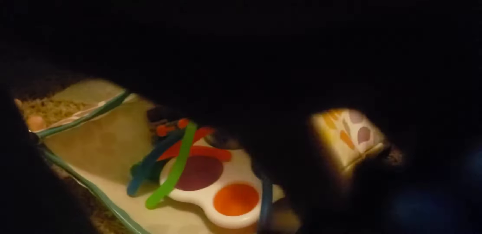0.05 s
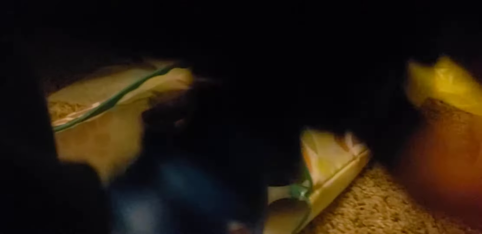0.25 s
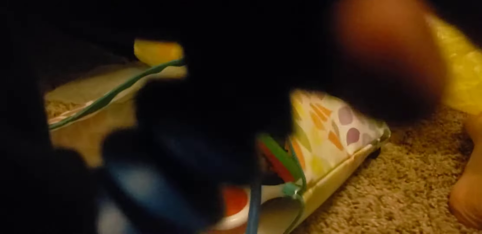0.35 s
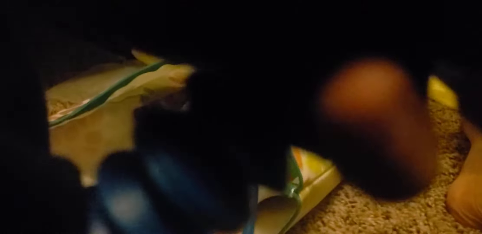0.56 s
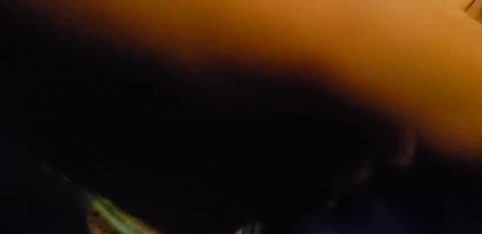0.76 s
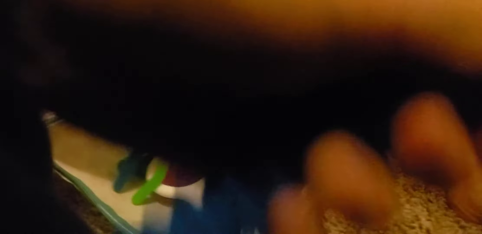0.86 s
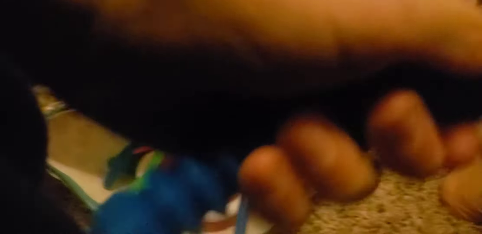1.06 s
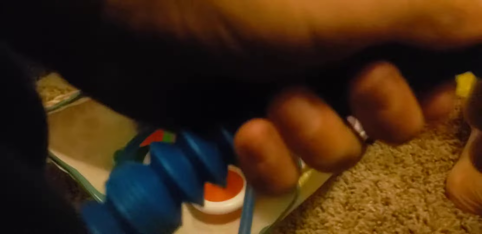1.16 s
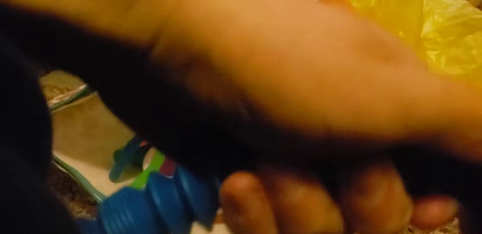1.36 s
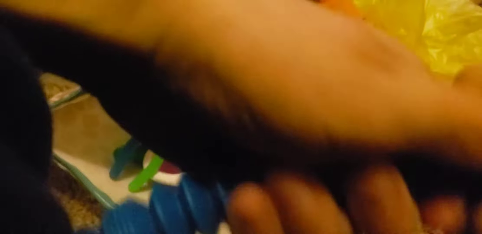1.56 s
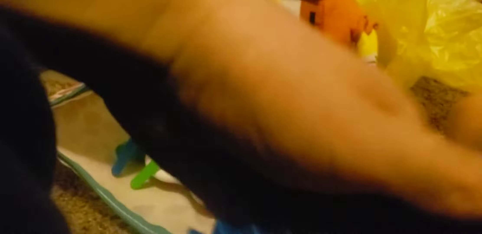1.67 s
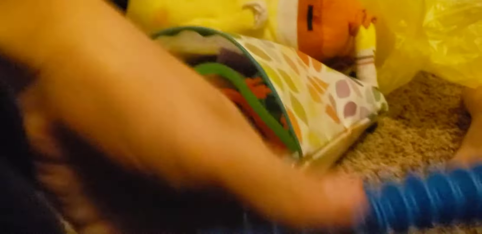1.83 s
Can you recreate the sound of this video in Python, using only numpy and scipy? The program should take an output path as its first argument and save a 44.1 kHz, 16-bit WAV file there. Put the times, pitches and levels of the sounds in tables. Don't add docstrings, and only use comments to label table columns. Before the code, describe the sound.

Sharp plastic snaps with a short hollow ring crowd together early, then small finger ticks, a single pop, and a final tight cluster, with light handling thuds, heard close in a small, dry carpeted room.

```python
import sys
import numpy as np
from scipy import signal
from scipy.io import wavfile
from scipy.ndimage import map_coordinates

SR = 44100
rng = np.random.default_rng(int(sys.argv[2]) if len(sys.argv) > 2 else 0)


def decibels_to_gain(level_db):
    exponent = np.asarray(level_db, float) / 20
    return 10 ** exponent


def generate_wav(signal):
    frames = np.transpose(np.atleast_2d(signal))
    scaled = np.clip(frames, -1, 1) * 32767
    pcm = np.round(scaled).astype(np.int16)
    wavfile.write(sys.argv[1], SR, pcm)


N = 83790
LEAD = SR // 10


def rms_one(x):
    return x / np.sqrt(np.mean(x ** 2) + 1e-20)


def butter(x, hz, kind, order=2):
    return signal.sosfilt(signal.butter(order, hz, kind, fs=SR, output="sos"), x)


def drift(rate_hz):
    knots = rng.standard_normal(400)
    return map_coordinates(knots, [2 + np.arange(N) / SR * rate_hz], order=3)


def bell(x, hz, width_hz, db):
    a, w = decibels_to_gain(db / 2), 2 * np.pi * hz / SR
    q = np.sin(w) * width_hz / hz / 2
    middle = -2 * np.cos(w)
    return signal.lfilter([1 + q * a, middle, 1 - q * a], [1 + q / a, middle, 1 - q / a], x)


def dying(t, t60_s):
    return decibels_to_gain(-60 * t / t60_s)


def add(out, start_s, sound):
    i = int(start_s * SR) + LEAD
    out[i:i + len(sound)] += sound[:len(out) - i]


# time [s], mode spacing [Hz], upper-mode lift per mode [dB], upper-mode ring
COLUMN = [
    (0, 485, 1, 1.0),
    (.26, 496.6, 1.5, 1.0),
    (.35, 498, 0.5, 1.0),
    (.415, 531, 1, 0.78),
    (1.09, 537, 1, .7),
    (1.34, 551.4, -2.5, 0.46),
    (1.45, 590, 0, 0.85),
]
# multiple of spacing [ratio], level [dB], t60 [s]
COLUMN_MODES = [(.93, -16.5, 0.16), (.97, -12, 0.14), (2.0, -1.5, 0.056), (3.0, -1.5, 0.064),
                (4.02, -3.5, 0.029), (4.95, -1, 0.017), (6.0, -7, 0.02), (7.0, -5.5, 0.008)]


def column(start_s, place, t):
    times_s, *cols = np.transpose(COLUMN)
    spacing_hz, lift_db, share = [np.interp(start_s, times_s, c) for c in cols]
    ring = 0
    for multiple, level_db, t60_s in COLUMN_MODES:
        number = round(multiple)
        strength = decibels_to_gain(level_db + lift_db * multiple) * np.sin(np.pi * number * place)
        decay = dying(t, t60_s * share ** min(number / 2, 1))
        ring = ring - strength * np.sin(2 * np.pi * multiple * spacing_hz * t) * decay
    return butter(ring, 380, "high")


# start [s], snap level [dB], snap pitch [Hz], column level [dB], place along tube [0-1]
POPS = [(-.06, -32, 1950, -33, 0.35), (0.2424, 1, 4500, -21.5, 0.21), (0.2657, -1, 2605, -16.5, 0.34),
        (0.2751, -15.5, 4450, -24, 0.2), (0.3445, -6.5, 4080, -12, 0.28), (.3885, -3.5, 2195, -19, 0.41),
        (0.3992, -3.5, 4280, -28, 0.5), (.4134, 1.5, 2020, -16.5, .3), (0.4164, -9, 4730, -22.5, .3),
        (0.441, -4.5, 4000, -29.5, 0.2), (1.091, -1.5, 2785, -19, 0.31), (1.2966, -15.5, 5630, -23, 0.33),
        (1.3406, -16, 6170, -22, 0.37), (1.4388, -2.5, 4030, -24, 0.2), (1.4486, -1.5, 4080, -20.5, 0.38),
        (1.453, -2.5, 4020, -17, .3), (1.0907, -11, 6330, -40, 0.4), (.2659, -10.5, 5450, -35, 0.03),
        (.345, -9, 1910, -40, 0)]
CRACK_DB, CRACK_CYCLES = -4.5, 0.16
WALL_T60_S, SHIVER_DB, SHIVER_T60_S = 0.0031, -4.5, 0.0056
SNAP_LOW_HZ, SNAP_HIGH_HZ = 1290, 8000
SLIP_DB, SLIP_LOW_HZ, SLIP_TOP_HZ, SLIP_RISE_S, SLIP_T60_S = -29, 7800, 13000, 0.0076, 0.11


def pops():
    air, t = np.zeros(N + LEAD), np.arange(SR // 4) / SR
    noise = rng.standard_normal((len(POPS), len(t)))
    slip_swell = dying(t, SLIP_T60_S) * (1 - np.exp(-t / SLIP_RISE_S))
    for (start_s, level_db, pitch_hz, column_db, place), hiss in zip(POPS, noise):
        crack = -np.exp(-(t * pitch_hz / CRACK_CYCLES - 2) ** 2)
        wall = -np.sin(2 * np.pi * pitch_hz * t) * dying(t, WALL_T60_S)
        shiver = hiss * dying(t, SHIVER_T60_S)
        snap = decibels_to_gain(CRACK_DB) * crack + wall + decibels_to_gain(SHIVER_DB) * shiver
        snap = butter(butter(snap, SNAP_LOW_HZ, "high", order=3), SNAP_HIGH_HZ, "low")
        slip = butter(hiss, [SLIP_LOW_HZ, SLIP_TOP_HZ], "band", order=1) * slip_swell
        add(air, start_s, decibels_to_gain(level_db) * snap)
        add(air, start_s, decibels_to_gain(column_db) * column(start_s, place, t))
        add(air, start_s, decibels_to_gain(level_db + SLIP_DB) * slip)
    return air


# time [s], level [dB], brightness [dB per octave], grip rumble [dB]
RUB = [(0, -55, 2.5, -75), (0.039, -52.5, -3.5, -78), (0.109, -65, -3.5, -81), (0.189, -56, -1.5, -81),
       (.57, -67, 1.5, -76), (.66, -56.5, 2.5, -68.5), (.745, -46.5, -3, -64.5), (.79, -59, -2.5, -78),
       (.9, -54.5, -0.5, -79), (0.939, -60.5, -7, -79), (1.07, -49.5, -1.5, -80), (1.2, -55.5, 2.5, -69.5),
       (1.26, -69, -8.5, -76.5), (1.33, -59.5, 3.5, -72.5), (1.42, -71, -7, -68.5), (1.6, -62, -6.5, -80),
       (1.749, -52.5, 1, -78.5), (1.9, -63, 0, -78)]
# frequency [Hz], level [dB]
SKIN = [(200, -28), (700, -26), (1500, -24), (2500, -15), (4000, -11), (6000, 2), (10000, -2), (16000, 1)]
PATCHY_DB, RUB_SIDE_DB, RUB_COLUMN_DB, RUMBLE_HZ = 2, -8.5, -5.5, 90


def rubbing():
    times_s, *cols = np.transpose(RUB)
    level_db, bright_db, grip_db = [np.interp(np.arange(N) / SR, times_s, c) for c in cols]
    skin_hz, skin_db = np.transpose(SKIN)
    white = rng.standard_normal((2, 2, N))
    edges_hz = 180 * 2 ** np.arange(0, 6.6, .5)
    together = drift(25)
    rub = 0
    for k, (low_hz, high_hz) in enumerate(zip(edges_hz, edges_hz[1:])):
        mid, side = butter(white[k % 2], [low_hz, high_hz], "band")
        hz = np.sqrt(low_hz * high_hz)
        colour_db = np.interp(np.log(hz), np.log(skin_hz), skin_db)
        colour_db = colour_db + bright_db * np.log2(max(hz, 2500) / 5500)
        patches_db = PATCHY_DB * (.3 * together + drift(35))
        rub = rub + decibels_to_gain(colour_db + patches_db) * (mid + decibels_to_gain(RUB_SIDE_DB) * side * [[1], [-1]])
    rumble = rms_one(butter(butter(white[0, 0, ::-1], RUMBLE_HZ, "low"), 45, "high", order=4))
    ring = column(.7, .3, np.arange(SR // 8) / SR)
    hum = rms_one(signal.fftconvolve(white[1, 1, ::-1], ring))[:N]
    slide = decibels_to_gain(level_db - 2) * rms_one(rub) + decibels_to_gain(grip_db + RUB_COLUMN_DB) * hum
    return slide, decibels_to_gain(grip_db + 2.3 * drift(21)) * rumble


# start [s], level [dB]
JOLTS = [(0.244, -40), (0.274, -28.5), (0.349, -39.5), (0.39, -31), (.416, -27.5), (0.444, -39.5),
         (.672, -53.5), (1.093, -50.5), (1.297, -39.5), (1.342, -37.5), (1.442, -42), (1.462, -38),
         (0.731, -57.5), (1.745, -62), (0.644, -55.5)]
THUMP_DB, THUMP_HZ, THUMP_T60_S, THUMP_LAG_S = 4.5, 75, 0.081, 0.0064


def jolts():
    out, t = np.zeros(N + LEAD), np.arange(SR // 4) / SR
    swell = dying(t, THUMP_T60_S) * (1 - np.exp(-t / THUMP_LAG_S))
    for (start_s, level_db), hiss in zip(JOLTS, rng.standard_normal((len(JOLTS), len(t)))):
        pitch_hz = THUMP_HZ * (1 + hiss[0] / 8)
        thud = np.sin(2 * np.pi * pitch_hz * t) + 3.7 * butter(hiss, 390, "low")
        add(out, start_s, decibels_to_gain(level_db + THUMP_DB) * swell * thud)
    return out[LEAD:]


# start [s], peak
# level [dB], pitch [Hz]
TICKS = [(0.5676, -43, 4940), (.597, -31.5, 6500), (0.5994, -45, 6000), (.6057, -41, 7000),
         (0.61, -42.5, 4000), (.619, -45.5, 2440), (0.6212, -33.5, 5500), (0.6293, -39, 4000),
         (.635, -28.5, 4400), (0.6378, -34.5, 1700), (0.6465, -34.5, 10840), (0.646, -38, 2000),
         (0.6556, -37.5, 5500), (0.6714, -33, 10150), (.672, -47, 2500), (1.275, -40.5, 2786),
         (1.434, -32, 4660), (1.566, -41.5, 6000), (1.609, -34.5, 4010), (1.6273, -44.5, 5930),
         (1.636, -33, 4110), (1.6477, -38, 3970), (1.67, -37.5, 6460), (1.6815, -40.5, 4500),
         (1.7445, -39, 2493), (1.3409, -20, 10500), (1.3405, -23, 3630), (1.0916, -12.5, 9700)]
TICK_DB, TICK_WIDE_DB, TICK_SPREAD, TICK_T60_S = 3, -13.5, 1.547, 0.004


def ticks():
    out, t = np.zeros(N + LEAD), np.arange(SR // 50) / SR
    for (start_s, level_db, pitch_hz), hiss in zip(TICKS, rng.standard_normal((len(TICKS), len(t)))):
        burst = hiss * dying(t, TICK_T60_S)
        band_hz = [pitch_hz / TICK_SPREAD, min(pitch_hz * TICK_SPREAD, .45 * SR)]
        tick = butter(burst, band_hz, "band") + decibels_to_gain(TICK_WIDE_DB) * burst
        add(out, start_s, decibels_to_gain(level_db + TICK_DB) * tick)
    return out


ROOM_DB, ROOM_SIDE_DB, ROOM_T60_S, ROOM_RISE_S = -19, -20.5, 0.19, 0.0083
ROOM_LOW_HZ, ROOM_DULL_HZ = 302, 7000
NEAR_DB, NEAR_T60_S = 2.5, 0.034


def room(x):
    t = np.arange(SR // 2) / SR
    noise = butter(rng.standard_normal((2, len(t))), ROOM_LOW_HZ, "high")
    dull = butter(noise, ROOM_DULL_HZ, "low", order=1)
    walls = dull * dying(t, ROOM_T60_S) + .5 * (noise - dull) * dying(t, 0.75 * ROOM_T60_S)
    walls = walls * (1 - np.exp(-(t / ROOM_RISE_S) ** 2))
    tail = walls + decibels_to_gain(NEAR_DB) * dull * dying(t, NEAR_T60_S)
    tail = tail / np.sqrt(np.sum(tail[0] ** 2))
    mid, side = signal.fftconvolve(x[None], tail, axes=1)[:, LEAD:LEAD + N]
    return mid + decibels_to_gain(ROOM_SIDE_DB) * side * [[1], [-1]]


def scene():
    air = pops() + ticks()
    rub, rumble = rubbing()
    floor = decibels_to_gain(-76) * rng.standard_normal((2, N))
    return air[LEAD:] + decibels_to_gain(ROOM_DB) * room(air) + jolts() + rub + rumble + floor


def top_cut(x):
    return signal.sosfilt(signal.butter(12, 17140, fs=SR, output="sos"), x)


# centre [Hz], width [Hz], gain [dB]
PORT = [
    (5500, 1400, 11),
    (8000, 1500, -14),
    (10206, 2200, 6),
]
RIGHT_DB, RIGHT_NOTCH_DB, TOP, CUTOFF_HZ = -1.3747, -4, 1.118, 16600


def record(dry):
    x = dry
    for hz, width_hz, gain_db in PORT:
        x = bell(x, hz, width_hz, gain_db)
    right = decibels_to_gain(RIGHT_DB) * bell(x[1], 8500, 3000, RIGHT_NOTCH_DB)
    x = np.array([x[0], right])
    rounded = TOP * np.tanh(x / TOP)
    x = signal.sosfilt(signal.cheby2(12, 70, CUTOFF_HZ + 500, fs=SR, output="sos"), rounded)
    return top_cut(x)


dry = scene()
out = record(dry)
generate_wav(out)
```